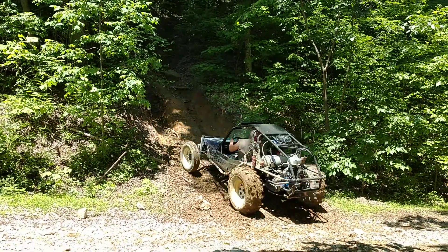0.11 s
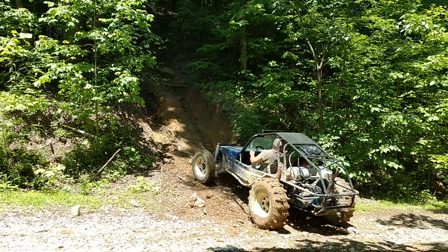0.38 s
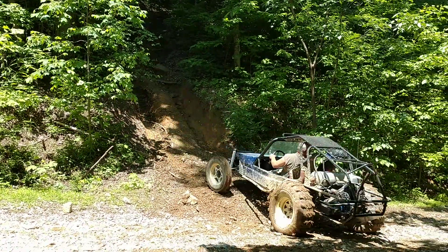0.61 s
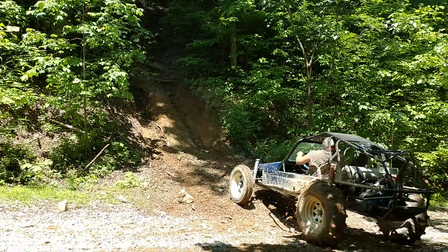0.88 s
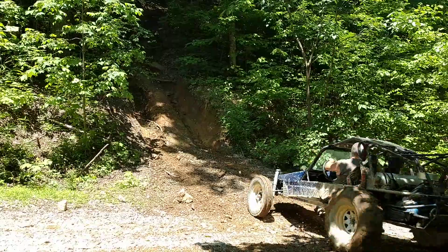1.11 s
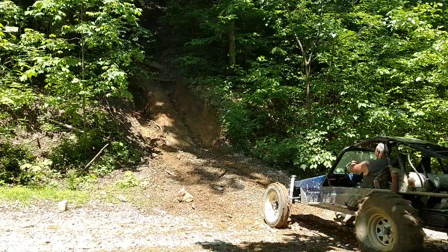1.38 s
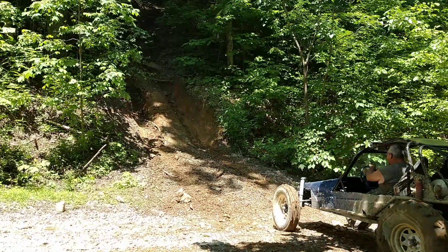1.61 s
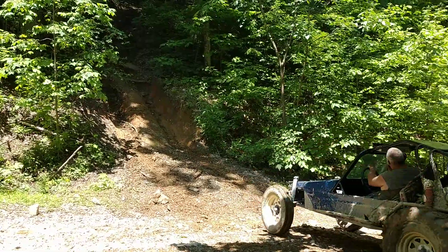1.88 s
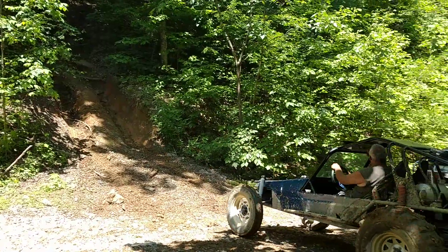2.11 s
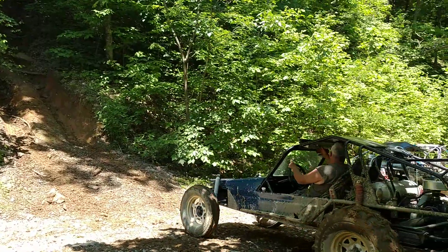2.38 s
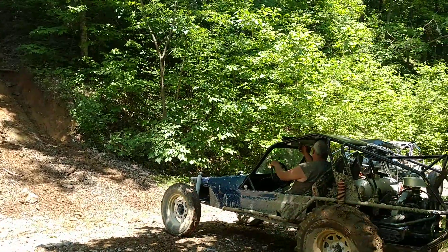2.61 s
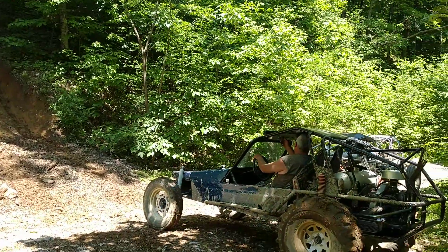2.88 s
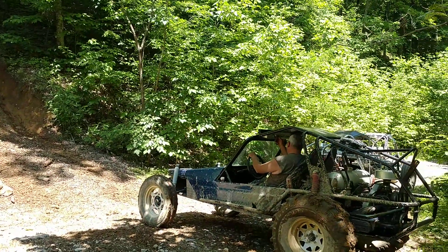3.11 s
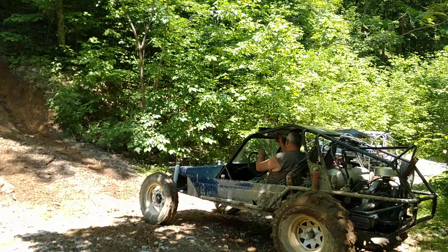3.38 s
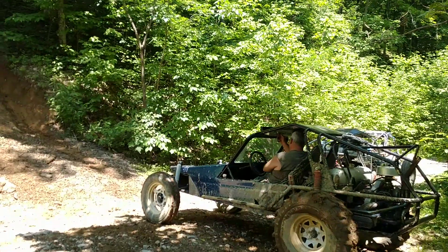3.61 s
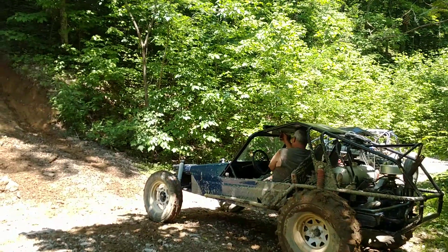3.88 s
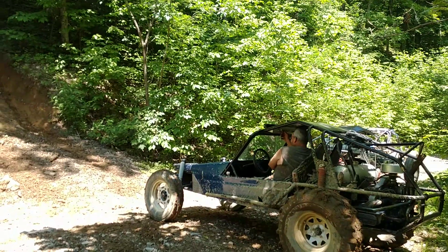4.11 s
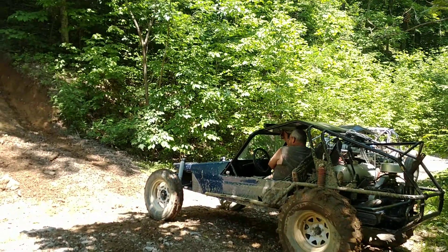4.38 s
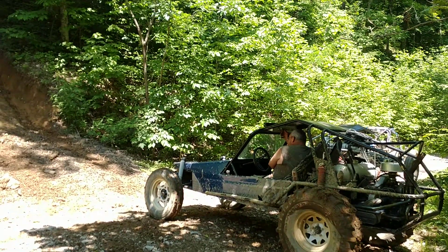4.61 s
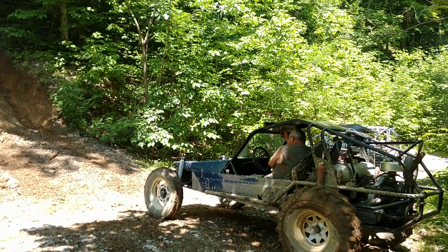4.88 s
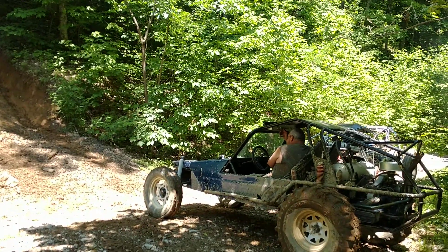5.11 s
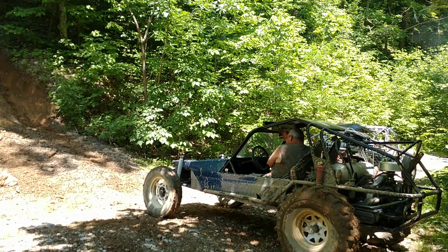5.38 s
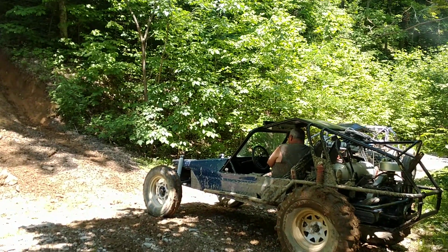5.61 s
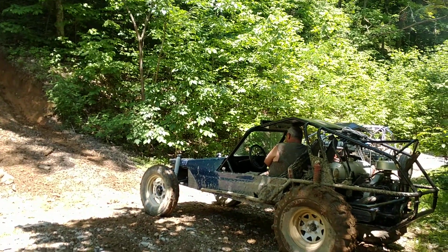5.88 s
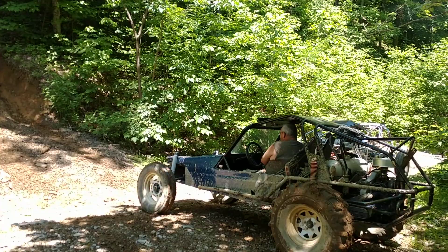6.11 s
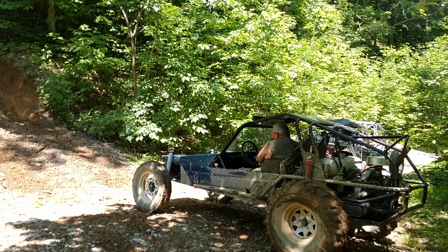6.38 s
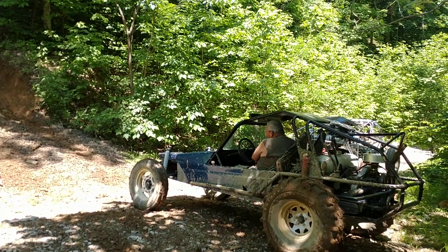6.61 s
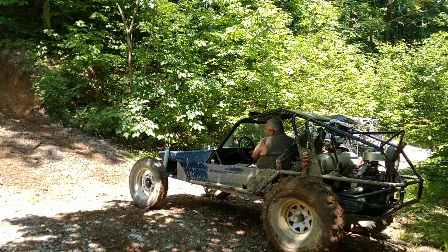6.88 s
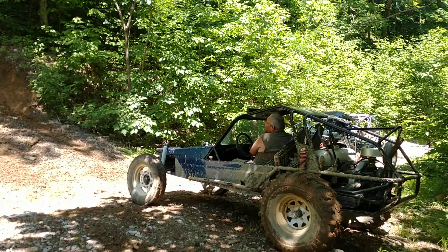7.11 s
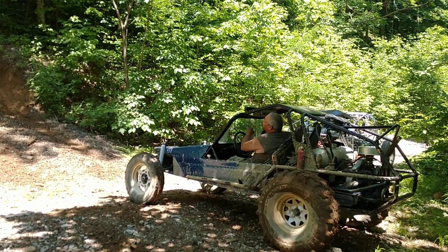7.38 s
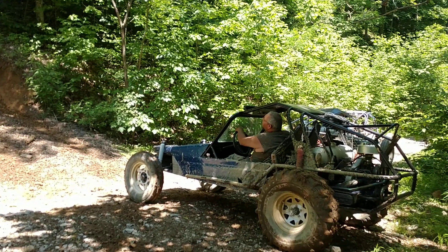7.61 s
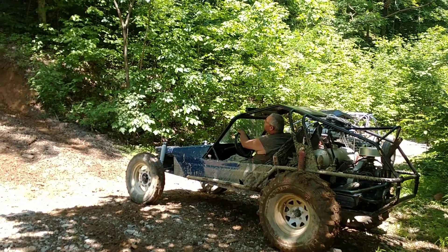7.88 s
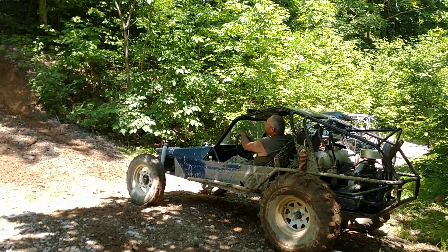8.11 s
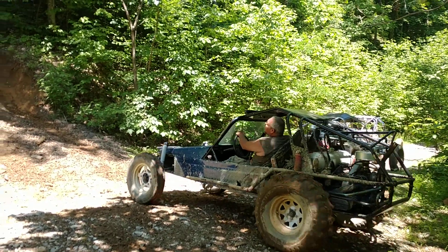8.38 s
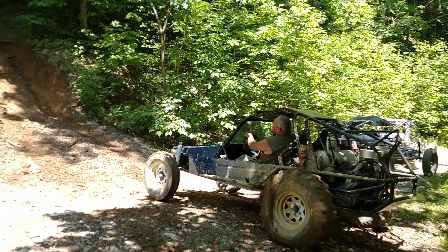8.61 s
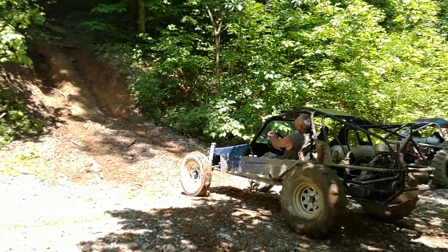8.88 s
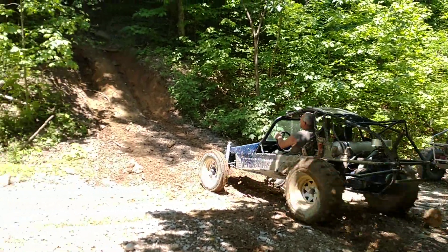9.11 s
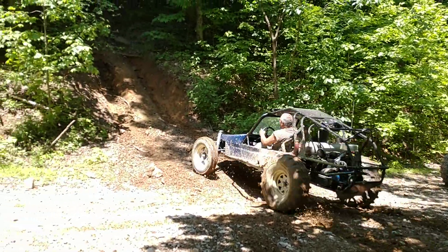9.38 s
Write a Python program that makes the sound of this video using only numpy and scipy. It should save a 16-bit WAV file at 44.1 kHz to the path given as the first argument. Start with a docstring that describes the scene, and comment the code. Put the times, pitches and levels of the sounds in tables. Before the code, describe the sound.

A stalled off-road buggy rolls back crunching over gravel, its starter grinds, then the engine pops, catches and revs in rough barking blips.

```python
"""A stalled buggy rolls back over gravel, then starts, in front of a pair of microphone ports.
Tyres are filtered grains and hiss; knocks are decaying tones and noise; squeaks are wavering tones.
The starter is tooth grains through resonances, over a brush whirr. Single pops crack and bark as the
engine catches; then firing-rate orders and pulsed noise follow the throttle as the driver blips it and
holds it open to pull away. Woods hiss steadily behind, and trees return a short soft echo."""
import sys
import numpy as np
from scipy import signal
from scipy.io import wavfile
from scipy.ndimage import uniform_filter1d

SR = 44100
rng = np.random.default_rng(int(sys.argv[2]) if len(sys.argv) > 2 else 0)


def decibels_to_gain(level_db):
    """Convert a level in decibels to a linear amplitude gain (20 dB per decade)."""
    exponent = np.asarray(level_db, float) / 20
    return 10 ** exponent


def wrap_up_sound(samples):
    """Save the sound to the file named by the first command line argument, as 16-bit audio."""
    columns = np.atleast_2d(samples).T
    # keep every value between -1 and 1, then stretch to whole-number steps
    tamed = np.clip(columns, -1, 1)
    steps = np.round(tamed * 32767).astype(np.int16)
    wavfile.write(sys.argv[1], SR, steps)


N = 418509
T = np.arange(N) / SR

# Levels in the tables are relative: filters, fixed gains and the ports shape them further.
# tyres rolling on gravel, base level: t/s, crunch level/dB, bright grit level/dB
ROLL = [(0, -36.5, -64), (.25, -55, -61), (.5, -40, -56), (.8, -34, -48), (.97, -45.5, -51.5),
        (1.25, -39, -49), (1.56, -45.5, -65), (1.75, -39, -52), (1.9, -57, -67), (2.15, -42.5, -58),
        (2.45, -57, -62), (2.77, -68, -75)]
# wheel breaking through loose stones: t/s, hold/s, level/dB
STONE_CRUNCHES = [(.065, 0.016, -31), (.26, 0.099, -32.5), (.38, 0.018, -26.5), (.585, 0.024, -26),
                  (.715, 0.018, -27.5), (1.01, 0.0063, -33), (1.11, 0.016, -34), (1.165, 0.032, -27.5),
                  (1.63, 0.026, -33.5), (1.93, 0.0043, -40.5), (1.98, 0.0088, -58), (2.06, .02, -47)]
# grit sliding and spraying: t/s, hold/s, level/dB
GRIT_SPRAYS = [(.485, .01, -41.5), (1.1, .03, -46), (1.33, .02, -45), (1.46, 0.014, -45), (1.53, .02, -46),
               (1.93, .005, -53), (1.98, .01, -64), (2.06, .005, -65), (2.14, 0.012, -45)]
# slopes of those swells: rise/(dB/s), fall/(dB/s)
CRUNCH_SLOPES = (292, 254)
SPRAY_SLOPES = (400, 250)
# spectrum of crunching stones, also of the knocks' puff: f/Hz, density level/dB
CRUNCH_SPECTRUM = [(30, -87), (60, -20.5), (120, -12), (200, -9.5), (370, -7), (560, 0.5), (850, -7),
                   (1200, -5), (1900, -6.5), (2900, -12.5), (4500, -20), (7000, -28), (10000, -32.5),
                   (13000, -32.5), (15500, -45)]
# spectrum of bright grit, also of the knocks' tick: f/Hz, density level/dB
GRIT_SPECTRUM = [(1500, -2), (3000, -5), (6000, 0), (11000, 2.5), (16000, -5)]
# steady hiss of the woods: f/Hz, density level/dB
WOODS_SPECTRUM = [(30, -22), (60, -17), (120, 9.5), (200, 3), (370, -12), (560, 5), (850, -3), (1200, -18),
                  (1900, 1), (2900, -14), (4500, -9), (7000, -25), (10000, -20.5), (13000, -21),
                  (15500, -28)]
# brakes and joints squeaking: t/s, length/s, central f/Hz, level/dB, fall per overtone/dB
SQUEAKS = [(.27, .03, 8500, -53, 20), (0.448, .07, 8650, -42, 20), (.76, .06, 8500, -46, 22),
           (1.234, 0.11, 2840, -40, 30), (1.443, 0.054, 6130, -44, -9), (.8, 0.044, 4180, -43, 30),
           (1.47, 0.045, 2470, -43, 30), (2.126, 0.029, 2410, -26, 13)]
# squeak from the other side of the ports: same columns
FAR_SQUEAK = [(6.37, 0.071, 4503, -27.5, 12)]
# frame and stones knocking: t/s, thump level/dB, body level/dB, tick level/dB
KNOCKS = [(1.003, -42, -26, -46), (1.097, -26, -27, -49), (1.129, -33, -27, -44), (1.449, -44, -35, -32),
          (1.516, -34, -39, -37.5), (1.602, -52, -47, -50), (1.728, -37, -34, -55), (1.75, -18, -37, -56),
          (1.862, -45, -33.5, -53), (1.912, -48, -35, -53), (1.925, -27, -27.5, -39.5),
          (1.979, -32, -34.5, -49), (2.057, -51, -38, -51), (2.272, -53, -55, -52), (2.376, -44, -36, -52),
          (2.403, -60, -42, -48), (2.424, -54, -37, -52), (2.496, -55, -45, -70), (2.554, -48, -35.5, -59),
          (2.759, -68, -58, -69), (2.786, -53, -42, -42), (2.805, -50, -37, -29), (2.95, -54, -35, -58),
          (3.835, -43, -49, -37.5), (9.038, -17, -18, -22)]
# frame modes, each knock detuning them: nominal f/Hz, level/dB, time to fall 60 dB/s
FRAME_MODES = [(215, 0, .02), (560, -1, .035), (1150, -3, .03), (1900, -6, .025)]
# starter between surges: t/s, growl level/dB, whirr level/dB
CRANK = [(2.79, -49, -58), (3.05, -43.5, -50), (4.5, -42.5, -56.5), (5.3, -44, -33)]
# gears growling as they load up: t/s, hold/s, level/dB
GROWLS = [(2.835, 0.029, -28), (2.96, 0.018, -37), (3.095, 0.033, -40.5), (3.22, 0.04, -42),
          (3.295, 0.033, -36), (3.4, 0.027, -38), (3.54, 0.02, -35.5), (3.64, 0.062, -36),
          (3.785, 0.035, -39), (3.895, 0.068, -35.5), (4.09, 0.046, -35), (4.18, 0.032, -44),
          (4.295, 0.024, -36), (4.385, 0.029, -42), (4.465, .03, -37), (4.57, 0.017, -33.5),
          (4.67, 0.026, -38), (4.81, 0.026, -37), (4.91, 0.035, -35.5), (5.1, .02, -34.5),
          (5.165, .01, -34.5), (5.278, 0.012, -37)]
# whirr surging as each compression is passed: t/s, hold/s, level/dB
WHIRRS = [(2.81, 0.0073, -33), (3.09, 0.017, -33.5), (3.22, .04, -38.5), (3.397, .01, -30.5),
          (3.51, 0.038, -35), (3.635, 0.027, -32.5), (3.75, 0.053, -38), (3.915, 0.019, -33.5),
          (4.035, .02, -39), (4.22, 0.063, -36), (4.375, 0.03, -39.5), (4.545, 0.032, -32.5),
          (4.665, 0.04, -38.5), (4.795, 0.012, -31), (4.88, 0.045, -37), (5.02, .01, -30),
          (5.1, 0.016, -36.5), (5.166, .01, -39)]
# slopes of those surges: rise/(dB/s), fall/(dB/s)
GROWL_SLOPES = (252, 249)
WHIRR_SLOPES = (247, 268)
# starter housing resonances, which waver a little: central f/Hz, width/Hz, level/dB
HOUSING_MODES = [(1089, 156, -2), (2090, 610, -2)]
# spectrum of the brush whirr: f/Hz, density level/dB
WHIRR_SPECTRUM = [(200, -48), (450, -26), (800, -7), (1500, -4), (2900, -5), (4500, -3.5), (7000, -5.5),
                  (10000, -4.5), (13000, -11), (16000, -24)]
# single pops, some in close groups: t/s, crack level/dB, bark level/dB
POPS = [(5.01, -1.5, -30), (5.0906, -12, -31), (5.1637, -1, -24), (5.222, -4.5, -27.5), (5.5196, -4.5, -28),
        (5.5665, -4.5, -19), (5.8097, -5, -22), (5.8264, -24, -31), (5.8424, -9, -32), (5.8574, -14, -31),
        (8.503, -7.5, -31)]
# engine speed: t/s, firing rate/(1/s)
SPEED = [(5.25, 30.7), (5.43, 58), (5.57, 66), (5.65, 62.5), (5.8, 54), (5.85, 66.5), (6.02, 117),
         (6.11, 100.4), (6.43, 73), (6.66, 58.5), (6.965, 85), (7.04, 78.5), (7.24, 61.5), (7.32, 61.6),
         (7.46, 69.5), (7.56, 72.7), (7.68, 64.6), (7.76, 70), (7.87, 97.5), (7.94, 108), (8.0, 93.5),
         (8.11, 91.1), (8.2, 120), (8.28, 120), (8.39, 94), (8.52, 62), (8.74, 73), (8.82, 71), (9.04, 66),
         (9.14, 69.6), (9.3, 78.5), (9.4, 76), (9.49, 68)]
# throttle blips, overlapping rows add up: open t/s, shut t/s, opening (fraction)
BLIPS = [(5.8, 6.045, 1), (6.67, 6.97, 1), (7.33, 7.595, 1), (7.68, 7.935, 1), (8.13, 8.285, 1),
         (8.51, 9.6, .95), (9.22, 9.6, .5)]
# running engine before the throttle's effect: t/s, roar level/dB, clatter level/dB
LOUDNESS = [(5.25, -36, -31), (5.45, -23.5, -39), (5.63, -29.5, -28.5), (5.78, -25, -26.5),
            (5.9, -23, -24.5), (6.25, -19, -23.5), (6.6, -23, -25), (6.85, -19, -26), (7.25, -20.5, -23),
            (7.5, -20.5, -27.5), (7.75, -19.5, -24.5), (8.1, -19.5, -23.5), (8.4, -22.5, -27.5),
            (8.6, -22.5, -23), (8.9, -21, -27.5), (9.25, -22, -25), (9.41, -20, -26.5), (9.49, -23, -28.5)]
# firing orders 1 to 3, by their frequency: f/Hz, level/dB throttle shut, level/dB throttle open
LOW_ORDERS = [(35, -53, -50), (57, -27.5, -33.5), (76, -27.5, -33), (95, -28, -31), (118, -36, -34),
              (130, -29.5, -44), (166, -25, -34), (190, -32.5, -26.5), (219.2, -33.5, -29), (256, -50, -42),
              (290, -36, -25.5), (340, -43, -32)]
# exhaust pipe response to higher orders: f/Hz, level per order/dB
PIPE_RESPONSE = [(250, -5), (330, -3), (400, -1), (500, 2), (620, 1), (720, -1), (800, -7), (1050, -11),
                 (1380, -6), (1600, -16)]
# sharp front of each firing: f/Hz, density level/dB
RAP_SPECTRUM = [(400, -23), (1300, 4), (2600, -7), (5000, -25), (14000, 2)]
# exhaust roar and bark: f/Hz, density level/dB
ROAR_SPECTRUM = [(40, -24), (120, -15), (250, -13), (400, -10), (500, -4), (620, 0), (800, -6), (1050, -6),
                 (1380, 0), (1600, -6), (2000, -5), (2750, -7), (3200, -20), (6000, -40)]
# engine clatter and pop crack: f/Hz, density level/dB
CLATTER_SPECTRUM = [(800, -29), (2500, -4), (4500, -2.5), (7000, -1.5), (10000, -2.5), (13000, -1),
                    (16000, -13)]
# phase between the ports before it is leaned: f/Hz, lead of right/turns
PORT_LEAD = [(0, 0), (250, .06), (350, .15), (400, -.15), (600, 0), (750, .05), (1050, 0), (1500, .23),
             (1950, .48), (2186, .5), (8700, 3.5), (9250, 3.68), (9750, 4.2), (10500, 4.1), (10700, 3.75),
             (11700, 3.5), (12500, 3.05), (15500, 1.5), (22050, 1.5)]
# balance of the ports: f/Hz, left over right level/dB
PORT_TILT = [(60, -6.2), (130, -6.2), (210, -3.5), (300, -7.5), (380, -12.5), (480, -4.5), (700, -1.5),
             (850, -5.5), (1300, 5.5), (1750, 5), (2000, 0), (2400, 0), (3000, -3), (4100, 0), (4600, 0),
             (5000, 2), (6500, 0), (9000, 1), (11500, -2), (13400, 0)]
# phase scatter at each port: f/Hz, scatter in line/rad, scatter added when across/rad
PORT_BLUR = [(100, .2, 0), (320, .35, 0), (380, .8, 0), (450, .25, 0), (600, .15, .2), (1100, .1, .35),
             (2000, .05, .45), (3000, .07, .9), (4400, .05, .9), (6600, .08, 1.1), (9500, .3, 1.4),
             (15000, .2, 1.0)]
# extra random phase at each port above 1.5 kHz, opposite in sign left and right,
# large at first and small once the engine runs: t/s, added/rad
EXTRA_PHASE = [(0, 0.29), (1.2, 0.16), (2.8, 0.14), (5.1, 0.081), (5.5, 0.022)]
# what the microphone passes: lower f/Hz, upper f/Hz
MIC_BAND = [52, 16150]


def evened(x):
    """Scales to rms 1."""
    return x / np.sqrt(np.mean(x ** 2) + 1e-20)


def read(points, hz, axis=1):
    """Reads a column of a spectrum on a log-frequency axis."""
    table = np.transpose(points)
    return np.interp(np.log(hz + 1), np.log(table[0] + 1), table[axis])


def columns(rows):
    """Curves at sample rate, after a softly edged switch that is on while they run."""
    s, *values = np.transpose(rows)
    on = uniform_filter1d(1. * (T >= s[0]) * (T <= s[-1]), size=400)
    return on, *(np.interp(T, s, v) for v in values)


def add(mix, s, sound):
    """Mixes a sound in at time s."""
    part = mix[round(s * SR):][:len(sound)]
    part += sound[:len(part)]


def colour(x, points):
    """Minimum-phase filter of energy 1 with the shape of the given spectrum."""
    log_gain = np.log(decibels_to_gain(read(points, abs(np.fft.fftfreq(4096, 1 / SR)))))
    taps = np.fft.ifft(np.exp(np.conj(signal.hilbert(log_gain)))).real[:2048]
    return signal.oaconvolve(x, taps / np.linalg.norm(taps))[:len(x)]


def resonate(x, hz, width):
    """Moving resonance: shifts the curve hz down to zero, smooths, and shifts back."""
    turn = np.exp(2j * np.pi * np.cumsum(hz * np.ones(len(x))) / SR)
    r = np.exp(-np.pi * width / SR)
    return 2 * (turn * signal.lfilter([1 - r], [1, -r], x / turn)).real


def narrow(x, hz, width):
    """A steep resonance, two in a row, at rms 1."""
    return evened(resonate(resonate(x, hz, width), hz, width))


def grains(spread_db, per_s, hiss):
    """Random clicks, a few large, over a share of even hiss; rms 1."""
    size = decibels_to_gain(spread_db * np.minimum(rng.exponential(1, N), 5)) * (rng.random(N) < per_s / SR)
    clicks = evened(size * rng.standard_normal(N))
    return evened(clicks + hiss * rng.standard_normal(N))


def burst(t60):
    """Noise that rises within 1.6 ms and dies away by 60 dB in t60 seconds."""
    t = T[:6000]
    return rng.standard_normal(len(t)) * decibels_to_gain(-60 * t / t60) * np.minimum(t / 0.0016, 1)


def wander(per_s):
    """Slow chance: normal random points, per_s a second, joined by straight lines."""
    steps = np.arange(0, T[-1] + 1, 1 / per_s)
    return np.interp(T, steps, rng.standard_normal(len(steps)))


def humps(rows, floor_db, slopes):
    """Level in dB: each row rises, holds and falls out of a floor, powers adding."""
    rise, fall = slopes
    power = decibels_to_gain(floor_db) ** 2
    for s, hold, db in rows:
        early = np.maximum(s - hold / 2 - T, 0)
        late = np.maximum(T - s - hold / 2, 0)
        power = power + decibels_to_gain(db - rise * early - fall * late) ** 2
    return 10 * np.log10(power)


def bumps(times, width):
    """Sum of smooth bumps, each of height 1."""
    return sum(np.exp(-((T - s) / width) ** 2) for s in times)


def woods():
    """Steady noise with the spectrum of the woods."""
    return decibels_to_gain(-57) * colour(rng.standard_normal(N), WOODS_SPECTRUM)


def tyres():
    """Stones crack and slide under the tread while the floor pan hums along with the crunch."""
    on, roll_db, fine_db = columns(ROLL)
    crunch_db = humps(STONE_CRUNCHES, roll_db, CRUNCH_SLOPES)
    spray_db = humps(GRIT_SPRAYS, fine_db, SPRAY_SLOPES)
    grit_level = decibels_to_gain(spray_db) + decibels_to_gain(crunch_db - 22)  # each crunch carries some grit
    stones = grains(spread_db=3.3, per_s=4500, hiss=0.8)
    crunch = colour(decibels_to_gain(crunch_db) * stones, CRUNCH_SPECTRUM)
    pan_level = decibels_to_gain(crunch_db - 14 + 4 * wander(8))
    pan = pan_level * narrow(stones, 260 * (1 + .13 * wander(7)), width=45)
    grit = colour(grit_level * grains(spread_db=5., per_s=6000, hiss=.7), GRIT_SPECTRUM)
    return on * (crunch + pan + grit)


def trees(x):
    """Echo as a short diffuse tail: decaying noise that begins after 8 ms."""
    t = T[:12000]
    tail = rng.standard_normal(12000) * decibels_to_gain(-60 * t / 0.36) * (t > .008)
    return decibels_to_gain(-14) * signal.oaconvolve(x, tail / np.linalg.norm(tail))[:N]


def squeaks(rows):
    """Stick-slip tones with overtones that rise at first and waver."""
    out = np.zeros(N)
    for s, length, hz, db, fall_db in rows:
        t = T[:round(length * SR)]
        waver = evened(uniform_filter1d(rng.standard_normal(len(t)), 150))
        turns = np.cumsum(hz * (1 - .06 * np.exp(-t / .008) + .008 * waver)) / SR
        tone = np.zeros(len(t))
        for k in range(1, 7):
            if k * hz < SR / 3:
                tone += decibels_to_gain(-fall_db * (k - 1)) * np.sin(2 * np.pi * k * turns)
        add(out, s, decibels_to_gain(db) * tone * signal.windows.tukey(len(t), .5))
    return out


def knocks():
    """A low push, the ringing frame and a bright tick."""
    out, t = np.zeros(N), T[:6000]
    for s, thump_db, body_db, tick_db in KNOCKS:
        ring = []
        for hz, db, t60 in FRAME_MODES:
            detune = rng.uniform(0.81, 1.06)
            ring.append(decibels_to_gain(db - 60 * t / t60) * np.sin(2 * np.pi * hz * detune * t))
        push = 142 * np.gradient(ring[0] * t / 0.0041)  # a slope, so no lasting pressure
        puff = colour(burst(.03), CRUNCH_SPECTRUM)
        tick = colour(burst(.03), GRIT_SPECTRUM)
        add(out, s, decibels_to_gain(thump_db) * push)
        add(out, s, 0.98 * decibels_to_gain(body_db) * (sum(ring[1:]) + 1.1 * puff))
        add(out, s, 4.5 * decibels_to_gain(tick_db) * tick)
    return out


def starter():
    """Uneven tooth blows give a rough whine that sags at each compression; the brushes whirr."""
    on, idle_db, brush_db = columns(CRANK)
    growl_db = humps(GROWLS, idle_db, GROWL_SLOPES)
    whirr_db = humps(WHIRRS, brush_db, WHIRR_SLOPES)
    whine_hz = 599 - 2.5 * (growl_db - idle_db)  # sags as the gears growl
    teeth = grains(spread_db=1.5, per_s=1500, hiss=1.0)
    waver = 1 + .06 * wander(25)
    growl = narrow(teeth, whine_hz * waver, width=188)
    # the housing rings with growl and whirr together
    ring = sum(decibels_to_gain(db) * narrow(teeth, hz * np.sqrt(waver), width) for hz, width, db in HOUSING_MODES)
    housing = decibels_to_gain(.5 * (growl_db + whirr_db) + 1) * ring
    # air pushed out by the unfired cylinders
    chug = decibels_to_gain(-10) * narrow(rng.standard_normal(N), 123, width=197)
    whirr = colour(grains(spread_db=1.5, per_s=6000, hiss=0.58), WHIRR_SPECTRUM)
    return on * (0.89 * decibels_to_gain(growl_db) * (growl + chug) + housing + 1.86 * decibels_to_gain(whirr_db) * whirr)


def catching():
    """A run of pops whose gaps close up as the engine catches, every other bark weaker."""
    first_gap_s, last_gap_s, shrink = .0376, .0166, .65
    gaps = last_gap_s + (first_gap_s - last_gap_s) * shrink ** np.arange(11)
    times = 5.2676 + np.cumsum(gaps) - gaps
    return [(s, -2.5, -20 - 4 * (n % 2 == 0)) for n, s in enumerate(times)]


def pops():
    """Each pop is a sharp crack and a bark from the pipe, with a low push."""
    out, t = np.zeros(N), T[:3000]
    for s, crack_db, bark_db in POPS + catching():
        crack = colour(burst(.04), CLATTER_SPECTRUM)
        bark = colour(burst(.033), ROAR_SPECTRUM)
        push = decibels_to_gain(bark_db + 5 - 60 * t / 0.023) * np.sin(2 * np.pi * 154 * t)
        add(out, s, push)
        add(out, s - .001, .5 * decibels_to_gain(crack_db) * crack + 2.5 * decibels_to_gain(bark_db) * bark)
    return out


def controls():
    """Throttle opening, and the roar and clatter levels that answer it."""
    opens, shuts, _ = np.transpose(BLIPS)
    pedal = sum(size * (T > a) * (T < b) for a, b, size in BLIPS)
    throttle = uniform_filter1d(pedal, size=round(.025 * SR))
    shut = bumps(shuts + 0.031, width=0.031)  # both levels sink just after it shuts
    bite = bumps(opens + .01, width=0.036)  # clatter jumps as it opens
    gulp = bumps(opens + 0.075, width=0.036)  # then both sink briefly
    _, roar_db, clatter_db = columns(LOUDNESS)
    return throttle, roar_db - 4.5 * shut - gulp, clatter_db - 2 * shut + 2.5 * bite - gulp


def low_orders(hz, turns, load):
    """Orders 1 to 3: suction and exhaust push in opposite senses, so they dip as the throttle moves."""
    low = np.zeros(N)
    for k in range(1, 4):
        shut_db = read(LOW_ORDERS, k * hz) - 3.5 * (k > 2)  # third is weaker on a shut throttle
        open_db = read(LOW_ORDERS, k * hz, axis=2)
        push = (1 - load) * decibels_to_gain(shut_db) - load * decibels_to_gain(open_db)
        low += push * decibels_to_gain(1.5 * wander(12)) * np.sqrt(2) * np.cos(2 * np.pi * k * turns + k)
    return low * decibels_to_gain(-14 * np.clip((5.64 - T) / 0.029, 0, 1))  # weaker until every cylinder fires


def pipe_orders(hz, turns, run):
    """Higher orders through the pipe; unequal cylinders leave weak half orders between whole ones."""
    pipe = np.zeros(N)
    for k in range(7, 46):  # k counts half orders
        swell_db = 2.5 * wander(10)[run]
        drift = .0013 * k * k * wander(25)[run]  # uneven burning roughens high orders most
        level = (1 if k % 2 == 0 else .24) * decibels_to_gain(read(PIPE_RESPONSE, k * hz[run] / 2) + swell_db)
        pipe[run] += level * np.cos(np.pi * k * turns[run] - .19 * k * k + drift)
    return pipe


def engine():
    """Orders of the firing rate, sharp raps, and noise puffed out at each firing."""
    on, hz = columns(SPEED)
    throttle, roar_db, clatter_db = controls()
    run = slice(round(SPEED[0][0] * SR), N)
    load = np.minimum(throttle, 1)
    turns = np.cumsum(hz * on) / SR  # one turn per firing
    low = low_orders(hz, turns, load)
    tonal = decibels_to_gain(roar_db - 12 + 5 * throttle) * pipe_orders(hz, turns, run)
    # no two firings alike, every other one softer
    chance = decibels_to_gain(1.504 * rng.standard_normal(2000))[turns.astype(int)]
    strength = chance * decibels_to_gain(2 - 4 * (turns % 2 >= 1))
    fires = np.diff(np.floor(turns), prepend=0)
    raps = evened(fires[run] * strength[run] * rng.uniform(-1.84, 1, N)[run])
    raps = np.r_[np.zeros(run.start), raps]
    rap = colour(decibels_to_gain(roar_db - 16) * load * raps, RAP_SPECTRUM)
    puff = strength * np.exp(-(turns % 1) / 0.44) * 3.26
    depth = .12 + .27 * load  # an open throttle makes each puff stand out
    gate = uniform_filter1d(1 - depth + depth * puff, size=40)
    roar_grains = grains(spread_db=2.0, per_s=2500, hiss=0.74)
    roar = colour(decibels_to_gain(roar_db) * gate * roar_grains, ROAR_SPECTRUM)
    clatter_grains = grains(spread_db=1.0, per_s=6000, hiss=0.68)
    clatter = colour(decibels_to_gain(clatter_db) * gate * clatter_grains, CLATTER_SPECTRUM)
    return on * (low + tonal + rap + 0.88 * roar + 1.426 * clatter)


def scene():
    """The buggy stands on one side of the ports; one squeak comes from elsewhere and reaches both ports in
    phase."""
    near = tyres() + squeaks(SQUEAKS) + knocks() + starter() + pops() + engine()
    mix = near + trees(near) + woods()
    far = squeaks(FAR_SQUEAK)
    return np.array([mix + far, mix - far])  # opposite sign going in, so the ports' half-turn lead near 4.5 kHz leaves it in phase


def overload(x):
    """Soft overload: peaks near and above .9 are bent over."""
    return x / (1 + (x / .9) ** 4) ** 0.44


def microphone(x):
    """Passes a limited band: a gentle low edge and a steep high one."""
    x = signal.sosfilt(signal.butter(3, MIC_BAND[0], "high", fs=SR, output="sos"), x)
    taps = signal.firwin(255, MIC_BAND[1], window=("kaiser", 9), fs=SR)
    return signal.oaconvolve(x, taps[None], "same")


def ports(x):
    """Phase, balance and scatter between the two ports differ by frequency."""
    hz, frame_s, z = signal.stft(x, SR, nperseg=1024, noverlap=768)
    lead = 2 * np.pi * np.interp(hz, *np.transpose(PORT_LEAD))
    lead = lead - .35 * np.sin(2 * lead) * (hz > 2186)  # leans to in-phase or opposed higher up
    blur = read(PORT_BLUR, hz) + read(PORT_BLUR, hz, axis=2) * np.sin(lead) ** 2
    extra = np.interp(frame_s, *np.transpose(EXTRA_PHASE))
    blur = blur[:, None] + (hz > 1500)[:, None] * extra
    # chance smoothed over 3 frames, then over 4 frequency bins
    chance = evened(uniform_filter1d(rng.standard_normal(z.shape[:0:-1]), size=3, axis=0)).T
    chance = evened(uniform_filter1d(chance, size=4, axis=0))
    side = np.array([-.5, .5])[:, None, None]  # left, right
    phase = 2 * side * (.5 * lead[:, None] + blur * chance)
    z = z * np.exp(1j * phase) * decibels_to_gain(-side * read(PORT_TILT, hz)[:, None])
    return signal.istft(z, SR, nperseg=1024, noverlap=768)[1][:, :N]


def band_limit(x):
    """A steep low-pass at the top of the band."""
    return signal.sosfilt(signal.butter(12, 16420, fs=SR, output="sos"), x)


def record(dry):
    """Overload, microphone band and port differences, in that order, finish the mix."""
    mix = ports(microphone(overload(dry)))
    return band_limit(mix)


dry = scene()
out = record(dry)
wrap_up_sound(out)
```